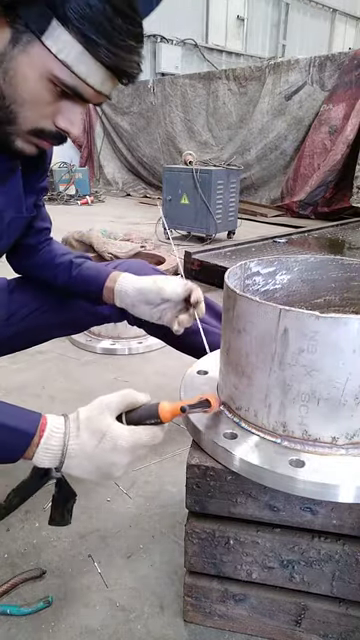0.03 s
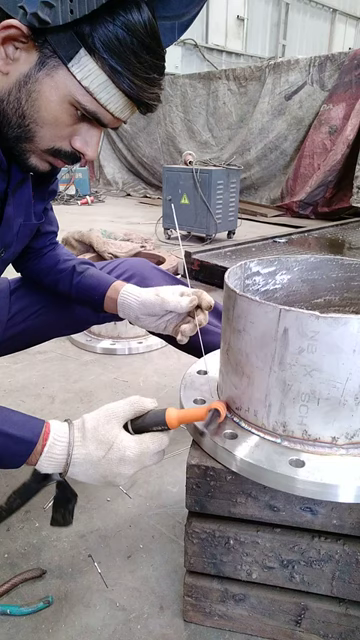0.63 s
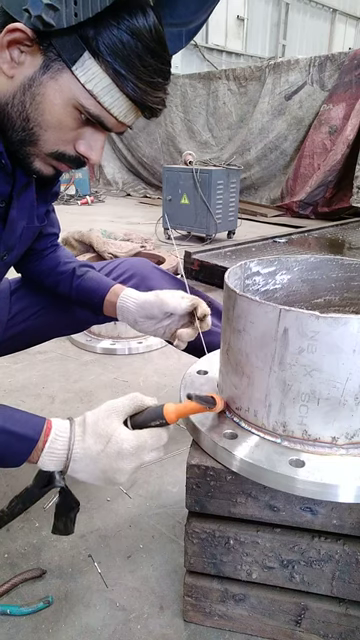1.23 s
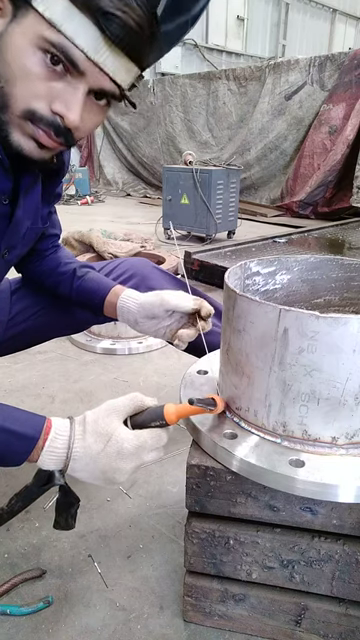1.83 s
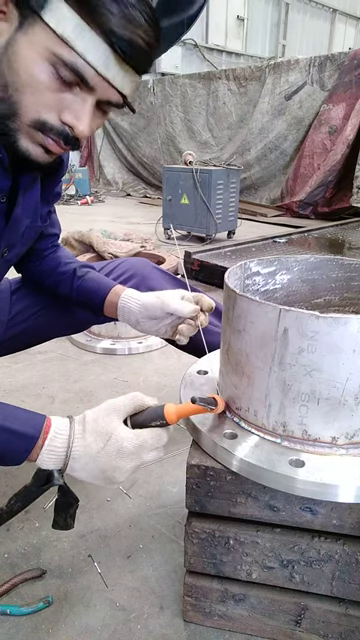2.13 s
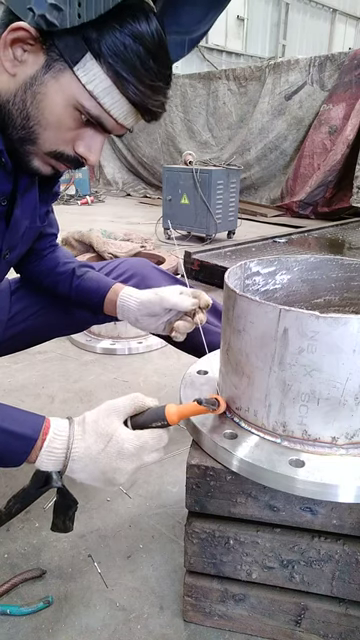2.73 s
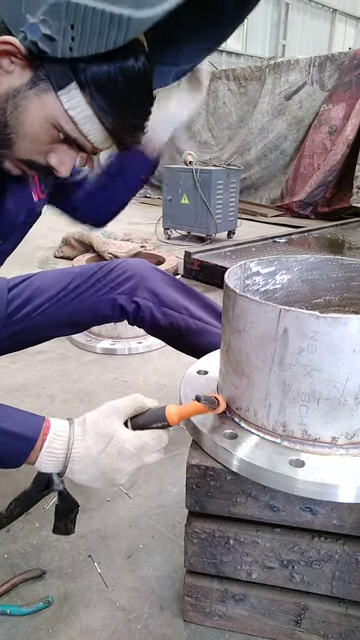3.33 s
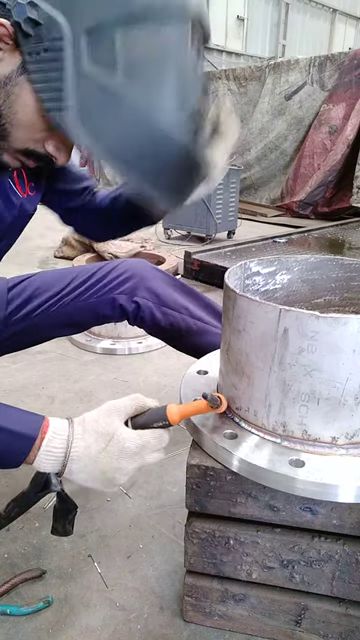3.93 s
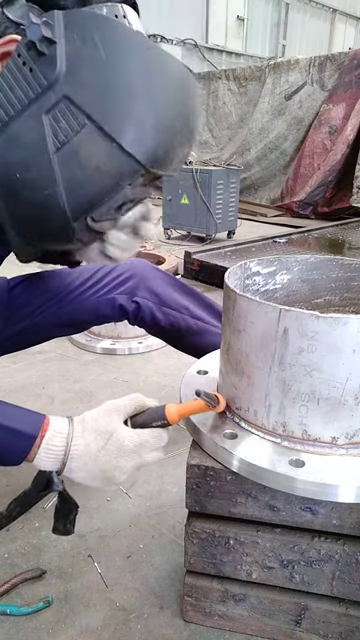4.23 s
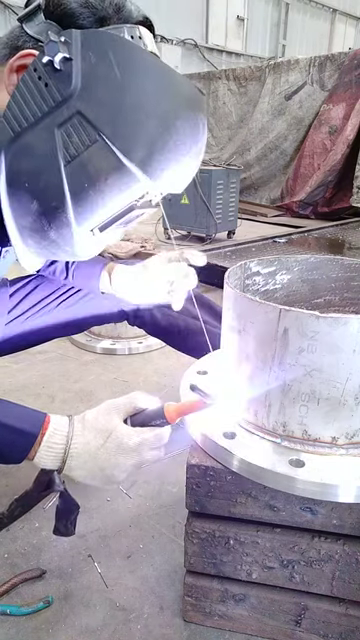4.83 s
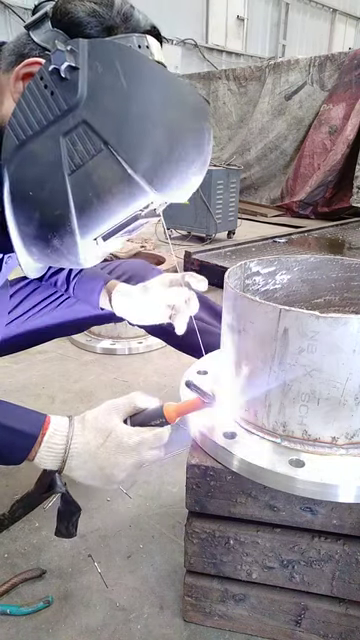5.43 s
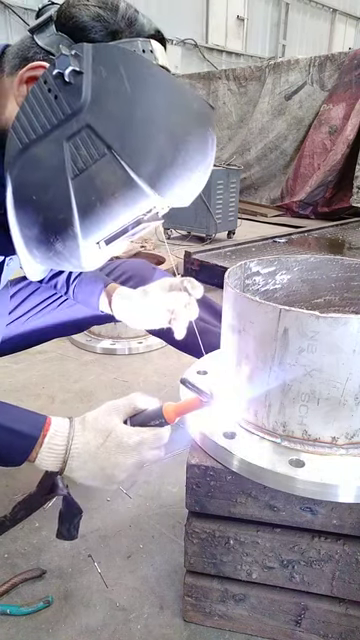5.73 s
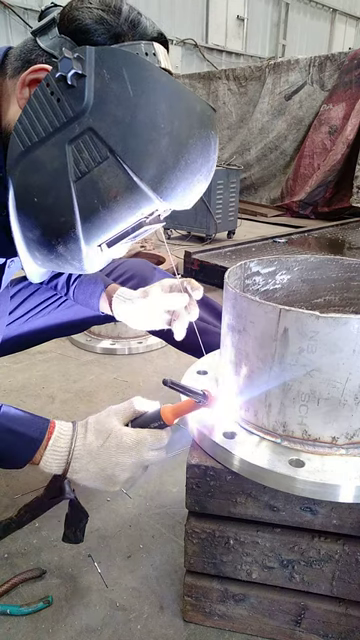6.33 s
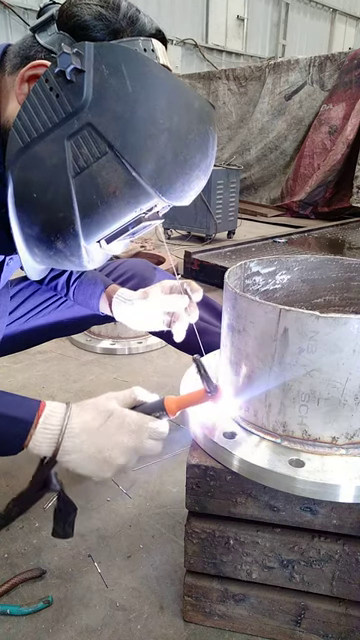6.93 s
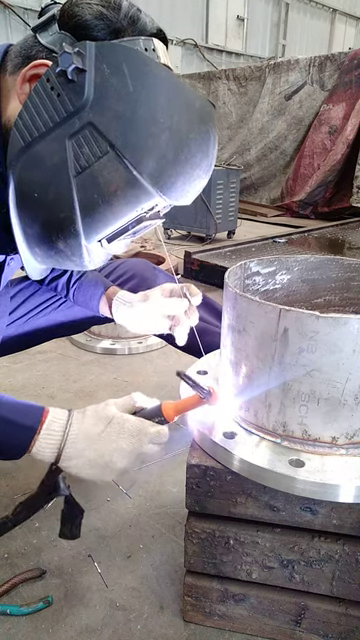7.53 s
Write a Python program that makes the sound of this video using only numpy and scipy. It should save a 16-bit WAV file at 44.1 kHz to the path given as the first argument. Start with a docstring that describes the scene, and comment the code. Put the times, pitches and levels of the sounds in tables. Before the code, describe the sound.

From the start, an angle grinder works on steel across a large workshop, giving a steady high hiss and a thin whine that flares unevenly. Beneath it run the low hum and whirring fan of a welding set. From about 2 seconds the whine rises in pitch, peaks a little after 3 seconds and falls back by 4.5. At 4 seconds a welding helmet gives one very short, high squeak. Near 4.8 seconds the starter spits faintly, and the arc strikes at once with a single sharp, close pop, the loudest sound, which echoes in the hall for about a second. The arc then burns with a soft, flickering rush with a hollow ring to it. The arc, grinder and hum continue together until the end, at about 7.7 seconds.

```python
"""TIG welding in a large workshop

An angle grinder hisses and whines across the hall, over the hum of the welding set and its fan.
A helmet squeaks down and the high-voltage starter spits. The gap to the steel flange breaks down
in one sharp pop that the hall answers; the arc then burns with a soft rush, made hollow by cavities."""
import sys
import numpy as np
from scipy import signal
from scipy.fft import rfft, irfft
from scipy.io import wavfile
from scipy.ndimage import uniform_filter1d, map_coordinates

SR = 44100
rng = np.random.default_rng(int(sys.argv[2]) if len(sys.argv) > 2 else 0)


def digitize_waveform(pressure):
    """Quantize a signal to 16-bit integers and store it at the path in sys.argv[1].

    Rows of a 2-D input are taken as channels; values are limited to [-1, 1].
    """
    field = np.atleast_2d(pressure).T
    bounded = np.clip(field, -1, 1)
    quanta = np.round(bounded * 32767).astype(np.int16)
    wavfile.write(sys.argv[1], SR, quanta)


N = 338688
TIME, HZ = np.arange(N) / SR, np.fft.rfftfreq(N, 1 / SR)
STRIKE_S, GEAR_TEETH = 4.8396, 39


def gain_of(db):
    """Amplitude ratio of a level in decibels."""
    return 10 ** (np.asarray(db) / 20)


def unit_rms(x):
    """Normalisation to an rms of 1."""
    return x / np.sqrt(np.mean(x ** 2) + 1e-20)


def spectrum(points):
    """Interpolation of (f/Hz, value) points over logarithmic frequency."""
    f, value = np.transpose(points)
    return np.interp(np.log(HZ + 1), np.log(f + 1), value)


def curve(points):
    """Linear interpolation of (t/s, value) points at every sample."""
    return np.interp(TIME, *np.transpose(points))


def swell(peak_s, length_s):
    """Raised-cosine envelope: one smooth rise to 1 and fall."""
    return np.cos(np.pi * np.clip((TIME - peak_s) / length_s, -.5, .5)) ** 2


def drift(rate_hz):
    """Random fluctuation: low-pass noise of rms 1."""
    return unit_rms(irfft(rfft(rng.standard_normal(N)) * (HZ > 0) / (1 + (HZ / rate_hz) ** 4), N))


def resonate(x, hz, width_hz):
    """Damped resonator of unit gain, whose centre frequency may glide."""
    carrier = np.exp(2j * np.pi * np.cumsum(hz * np.ones(N)) / SR)
    pole = np.exp(-np.pi * width_hz / SR)
    return 2 * (carrier * signal.lfilter([1 - pole], [1, -pole], x / carrier)).real


def narrowband(x, hz, width_hz):
    """Two resonators in cascade select one band, scaled to rms 1."""
    return unit_rms(resonate(resonate(x, hz, width_hz), hz, width_hz))


def tone(hz, db, wander_hz, waver_db):
    """Sinusoid with random frequency and amplitude modulation."""
    cycles = np.cumsum(hz + wander_hz * drift(5.83)) / SR + rng.random()
    return np.sqrt(2) * np.sin(2 * np.pi * cycles) * gain_of(db + waver_db * drift(15.4))


# Likeness of the sound at the two microphones: f/Hz, coherence (0-1)
COHERENCE = [(60, 1), (460, 0.92), (600, 0.5), (740, 0.9), (1000, 0.37), (1600, 0.4), (2400, 1), (3500, 1),
             (4200, 0.23)]
# Phase by which the left microphone leads: f/Hz, phase/rad
PHASE_LEAD = [(400, 0), (690, -.6), (950, -.2), (1200, -.8), (1900, -1.3), (2800, -2.3), (3600, -3)]
def air_noise(density_db):
    """Noise of a given spectral density, partially coherent at two points in the field."""
    left, independent = rfft(rng.standard_normal((2, N)))
    coherence = spectrum(COHERENCE)
    right = coherence * left + np.sqrt(1 - coherence ** 2) * independent
    right = right * np.exp(-1j * spectrum(PHASE_LEAD))
    return irfft(np.array([left, right]) * gain_of(density_db), N) * np.sqrt(SR / 2)


# Faint workshop tones: peak t/s, duration/s, f/Hz, peak level/dB
FAINT_TONES = [(2.4, 1.2, 1015, -56), (2.778, 0.3, 790, -48), (3.355, .6, 790, -52),
               (4.576, .45, 1416, -51)]
def faint_tones():
    """Masking: brief tones rise out of the workshop noise and sink back under it."""
    return sum(tone(hz, db, wander_hz=7, waver_db=4) * swell(s, length)
               for s, length, hz, db in FAINT_TONES)


# Tones of the welding set and other machines: f/Hz, level/dB, start t/s, end t/s, rms waver/dB
MACHINE_TONES = [(107.5, -62, 1.5, 7.68, 3), (147.6, -60, 3.5, 6.4, 1.5), (190.7, -55.5, 6, 7.68, 3),
                 (200.3, -55.5, 3.5, 4.76, 3), (212.7, -58.5, -3, 7, 3), (240, -56, 5, 7.68, 3),
                 (443.2, -46.5, 0, 7.68, 0.47), (516.5, -55.5, 5, 6.6, 2)]
def machine_hum(fade_s=0.27):
    """Machine vibration radiates low tones; those that waver more in level also stray more in pitch."""
    out = np.zeros(N)
    for hz, db, start, end, waver_db in MACHINE_TONES:
        fade = np.clip(1 + np.minimum(TIME - start, end - TIME) / fade_s, 0, 1)
        out += tone(hz, db, wander_hz=0.51 + 0.5 * waver_db, waver_db=waver_db) * fade
    return out


# Fan and workshop air: f/Hz, relative spectral level/dB
FAN_AIR = [(25, -99), (48, -95), (70, -84), (105, -72.5), (210, -71.5), (400, -73), (620, -73.5),
           (780, -70), (1250, -71.5), (1450, -71), (1800, -71), (2200, -77), (3600, -77.5), (9000, -105)]
# Resonances of the fan casing: f/Hz, bandwidth/Hz, level/dB
CASING_MODES = [(774.6, 18, -55), (1408, 41, -49.5), (2510, 20, -52.5)]
# Motor whine and sidebands: offset in multiples of the shaft frequency, relative level/dB
MOTOR_LINES = [(-2, -11), (-1, -9), (0, 1.5), (1, -6.5)]
def welder_fan(shaft_hz=24.6, whine_hz=1790, whine_db=-52):
    """Turbulence excites the casing's modes; modulation once a turn gives the motor whine sidebands."""
    flow = air_noise(spectrum(FAN_AIR))
    casing = sum(gain_of(db) * unit_rms(resonate(air_noise(spectrum(FAN_AIR)), hz, width))
                 for hz, width, db in CASING_MODES)
    motor = [sum(tone(whine_hz + order * shaft_hz, whine_db + db, wander_hz=1.17, waver_db=4)
                 for order, db in MOTOR_LINES) for _ in range(2)]
    return (flow + casing) * gain_of(-0.78 + 1.25 * drift(14)) + np.array(motor)


def disc_grit(turn_s, likeness):
    """Comb filtering: the same grit comes round on each turn, adding delayed copies of its noise."""
    def turns_ago(x, turns):
        return map_coordinates(x, [np.arange(N) - turns * turn_s * SR], order=3, mode="wrap")
    noise = rng.standard_normal((2, N))
    return noise + sum(likeness ** k * np.array([turns_ago(x, k) for x in noise]) for k in (1, 2, 3))


# Hiss of the disc on steel: f/Hz, relative spectral level/dB
DISC_HISS = [(40, -55), (700, -16), (2200, -7), (3200, -6.5), (3700, -4), (4100, 2), (5200, 2.5),
             (6000, 1.2), (7300, 1.2), (7900, -4), (8200, -14), (8700, -14), (9400, -20), (10400, -27.5),
             (12500, -30), (15500, -45)]
# Reflections off the pipe and flange: left delay/s, right delay/s, relative level/dB
REFLECTIONS = [(.00145, 0.0013, -52), (.0024, 0.0017, -23)]
def disc_hiss(grit, effort_db, fizz_hz=8300, brightening=0.13):
    """Friction noise interferes with its reflections; the top fizz grows fastest with effort."""
    paths = 1 + sum(gain_of(db) * np.exp(-2j * np.pi * HZ * np.array([[left], [right]]))
                    for left, right, db in REFLECTIONS)
    hiss = unit_rms(irfft(rfft(grit) * paths * gain_of(spectrum(DISC_HISS)), N))
    fizz = irfft(rfft(hiss) * (HZ > fizz_hz), N)
    hiss += fizz * (gain_of(brightening * (effort_db - effort_db.mean())) - 1)
    flutter_db = 0.84 * drift(17) + 0.66 * drift(210)
    return hiss * gain_of(effort_db + 2.5 + flutter_db)


# Flares of the gear whine: peak t/s, duration/s, level change/dB
WHINE_FLARES = [(0.174, 0.11, 11.5), (.245, .07, 9), (.345, .06, 5), (.405, .07, 9), (0.513, .12, 8),
                (.587, .08, 11.5), (.66, .05, 0), (0.757, 0.11, 4), (.85, 0.073, 2), (.955, .11, 7.5),
                (1.1, .06, 0), (1.21, 0.066, 6), (1.306, 0.13, 9), (1.39, .07, 5), (1.553, .1, 5),
                (1.7, 0.1, 6.5), (2.87, .08, 6), (3.345, 0.12, 10), (3.47, .1, 4.5), (3.668, .14, 8.5),
                (3.76, .07, 5.5), (3.86, .1, 8), (4.094, 0.15, 9), (4.22, 0.19, 9.5), (4.37, .08, 5),
                (4.47, .16, 7.5), (4.58, .06, 5), (4.802, .07, 3), (4.91, .07, 9), (4.966, 0.062, -5),
                (5.135, .06, 5), (5.265, .09, 7.5), (5.33, .06, 2), (5.497, 0.099, 10.5), (5.67, .07, 11),
                (5.718, 0.088, 10), (5.846, .09, 7), (5.96, .09, 14), (6.04, .07, 5), (6.11, 0.1, 7.5),
                (6.213, 0.087, 7), (6.3, 0.19, 10.5), (6.42, 0.067, 5), (6.582, 0.11, 11.5),
                (6.737, .09, 6), (6.92, .06, 7), (7, 0.098, 8.5), (7.1, 0.054, 5), (7.263, .08, 1),
                (7.348, 0.12, 6.5), (7.514, .14, 9), (7.632, 0.064, 13)]
# Gear mesh, sidebands and a high overtone: multiple of the disc frequency, relative level/dB
GEAR_ORDERS = [(36, -15), (38, -26), (39, -3), (40, -14.5), (45, -16), (65, -21)]
def gear_whine(grit, mesh_hz, steadiness, effort_db, breath_db=-8.7, lines_db=-3.2):
    """Periodic tooth contact gives a breathy band and, at steady speed, thin spectral lines."""
    level_db = effort_db - 5.5 + sum(db * swell(s, length) for s, length, db in WHINE_FLARES)
    surge_db = 0.16 * (level_db - level_db.mean())  # surges favour the lines over the band
    breath = narrowband(grit, mesh_hz, width_hz=380) * gain_of(breath_db - surge_db)
    turns = np.cumsum(mesh_hz + 2.37 * drift(40)) / SR / GEAR_TEETH
    mesh = sum(gain_of(db) * np.exp(2j * np.pi * (order * turns + rng.random()))
               for order, db in GEAR_ORDERS)
    mesh *= gain_of(-15 * np.log2(mesh_hz / mesh_hz.mean()))  # louder as load drags the speed down
    # shifting paths vary the phase and level at each microphone
    lines = np.array([(mesh * np.exp(0.7j * drift(3.6))).real * gain_of(0.9 * drift(39))
                      for _ in range(2)])
    lines *= np.sqrt(2) * steadiness * gain_of(lines_db + surge_db / 2)
    return gain_of(level_db) * (breath + lines)


# The grinder's speed, heard as its gear-mesh frequency: t/s, f/Hz
MESH_PITCH = [(0, 4530), (.25, 4540), (.5, 4585), (1.4, 4595), (1.75, 4620), (1.92, 4685), (2.18, 4725),
              (2.4, 4885), (2.8, 5100), (3.1, 5210), (3.4, 5212), (3.7, 5175), (4.2, 4690), (4.38, 4550),
              (4.58, 4550), (4.72, 4462), (5.6, 4458), (6, 4415), (6.5, 4398), (7.1, 4418), (7.4, 4420),
              (7.68, 4450)]
# Grinding effort, heard as loudness: t/s, relative level/dB
GRINDING_EFFORT = [(0, -34.5), (.13, -36), (.2, -34.5), (1.4, -35.3), (2, -34), (2.3, -34), (2.55, -33.5),
                   (2.78, -32.5), (3.05, -33.5), (3.45, -32), (4, -31), (4.5, -34.5), (4.95, -33.5),
                   (5.42, -35), (5.65, -33.5), (7.68, -33.5)]
# Cooling air at top speed: f/Hz, spectral level/dB
COOLING_AIR = [(40, -105), (90, -84), (170, -94), (400, -78.5), (750, -78.5), (1300, -71.5), (2000, -82),
               (4000, -100), (9000, -130)]
def grinder(smear_hz_per_s=1500, cooling_db_per_octave=60):
    """Friction, gear and flow noise; the cooling air's rush swells steeply as the grinder speeds up."""
    mesh_hz, effort_db = curve(MESH_PITCH), curve(GRINDING_EFFORT)
    glide = uniform_filter1d(np.gradient(mesh_hz) * SR, size=8000)
    steadiness = 1 / (1 + (glide / smear_hz_per_s) ** 2)  # the hall smears gliding lines
    grit = disc_grit(turn_s=GEAR_TEETH / mesh_hz, likeness=0.42 * steadiness)
    hiss = disc_hiss(grit, effort_db)
    speed_octaves = np.log2(mesh_hz / mesh_hz.max())
    cooling = air_noise(spectrum(COOLING_AIR)) * gain_of(cooling_db_per_octave * speed_octaves)
    return hiss + cooling + gear_whine(grit, mesh_hz, steadiness, effort_db)


def helmet_squeak():
    """Friction at the pivot gives one narrow-band scrape as the helmet swings down."""
    scrape = narrowband(rng.standard_normal((2, N)), hz=6400, width_hz=170)
    return gain_of(-29.5) * scrape * swell(peak_s=3.996, length_s=0.034)


# Whiskers of discharge from the starter: start t/s, duration/s, f/Hz, bandwidth/Hz, level/dB
STARTER_SPITS = [(4.779, 0.017, 12600, 1800, -45), (4.828, 0.017, 7550, 2500, -35),
                 (4.829, .01, 12500, 1500, -48), (4.836, .012, 15000, 2500, -48)]
def starter():
    """Partial discharges fizz briefly as the high voltage reaches for the steel."""
    out = np.zeros((2, N))
    for s, length, hz, width, db in STARTER_SPITS:
        fizz = narrowband(rng.standard_normal((2, N)), hz, width)
        out += gain_of(db) * fizz * np.sin(np.pi * np.clip((TIME - s) / length, 0, 1))
    return out


def hall_reverberation(build_s=0.098, t60_s=1.0):
    """The far walls return the pop as a diffuse wash that builds, then decays exponentially."""
    colour_db = spectrum([(40, -44), (200, -27), (550, 3), (1000, 2), (1600, 6), (2400, 3),
                          (3300, -1), (5000, 4), (8000, -11), (11000, -38), (15000, -30)])
    age = np.maximum(TIME - STRIKE_S, 0)
    return air_noise(colour_db - 60) * (1 - np.exp(-age / build_s)) * gain_of(-60 * age / t60_s)


# Modes of the steel: f/Hz, relative level/dB, T60/s
STEEL_MODES = [(520, -27, .01), (1570, -19, 0.0079), (4700, -2, .003), (5500, 1, 0.004), (6360, 1, 0.0063)]
def spark(t, pulse_db, pulse_s=0.00014, ring_lead_s=0.00012, ring_rise_s=0.00025, ring_left_db=-17):
    """Impulse excitation: one pressure pulse at t = 0 and a brief, damped ring of steel."""
    u = t / pulse_s
    pulse = gain_of(pulse_db) * (u ** 2 - 1) * np.exp(-u ** 2 / 2)
    age = np.maximum(t + ring_lead_s, 0)
    ring = -sum((-1) ** k * gain_of(db - 60 * age / t60) * np.sin(2 * np.pi * hz * age)
                for k, (hz, db, t60) in enumerate(STEEL_MODES))
    onset = 1 - np.exp(-(age / ring_rise_s) ** 2)
    return pulse + ring * onset * gain_of([[ring_left_db], [0]])


# The pop scattered by pipe, flange and helmet: f/Hz, relative spectral level/dB
POP_SCATTER = [(200, -26.5), (500, 6), (900, 1), (2500, 4.5), (5000, -4), (7500, -6), (10000, -28)]
def strike(right_lead_s=0.0001, echo_s=0.0065, scatter_t60_s=0.068):
    """Dielectric breakdown of the gap: the pop arrives directly, off the floor and by scattering."""
    t = TIME - STRIKE_S + np.array([[0], [right_lead_s]])
    floor_echo = gain_of(-12) * spark(t - echo_s, pulse_db=-9)
    decay = (t > 0) * gain_of(-60 * np.maximum(t, 0) / scatter_t60_s)
    scatter = air_noise(spectrum(POP_SCATTER) - 58.5) * decay
    return spark(t, pulse_db=-1) + floor_echo + scatter


# Strength of the burning arc: t/s, relative level/dB
ARC_STRENGTH = [(5.1, 0), (5.27, 2), (5.42, -7), (5.5, -1), (5.68, 1.5), (6.3, 0), (6.85, -2), (7.68, -2.5)]
# The arc's broad rush: f/Hz, relative spectral level/dB
ARC_RUSH = [(30, -110), (100, -91), (500, -75.5), (900, -77.5), (1500, -73), (2300, -84), (4000, -69.5),
            (6000, -108), (11000, -109.5), (15500, -108)]
# Cavity modes of pipe and helmet: f/Hz, bandwidth/Hz, level/dB, peak t/s, time to fall 9 dB/s
CAVITY_MODES = [(785, 36, -50.5, 5.84, 0.59), (1403, 25, -42.5, 5.52, 0.19), (1370, 7.1, -45, 8.1, 1.94),
                (1474, 11, -50, 6.6, 1.5), (2230, 38, -48.5, 6, 1.4), (2614, 8, -48.5, 7, 2.5),
                (2970, 39, -47.5, 6, 2.5)]
def arc(rise_s=0.097, flicker_db=1.5):
    """Cavity resonance: the arc's flickering rush drives hollow modes, each loudest at its own time."""
    rush = air_noise(spectrum(ARC_RUSH))
    hollow = np.zeros((2, N))
    for hz, width, db, peak_s, fall_s in CAVITY_MODES:
        level_db = db - 9 * ((TIME - peak_s) / fall_s) ** 2
        hollow += gain_of(level_db) * unit_rms(resonate(rush, hz, width))
    lit = np.clip((TIME - STRIKE_S) / rise_s, 0, 1)
    return (rush + hollow) * lit * gain_of(curve(ARC_STRENGTH) + flicker_db * drift(26))


def scene():
    """Superposition: the machines run throughout; the helmet drops, the arc strikes and burns on."""
    workshop = grinder() + welder_fan() + machine_hum() + faint_tones()
    return workshop + starter() + strike() + hall_reverberation() + arc() + helmet_squeak()


# Balance of the microphone pair: f/Hz, left minus right level/dB
BALANCE = [(100, 1), (420, 1.5), (530, 6), (700, 1), (1020, 5), (1300, 2), (1650, 4.5), (2800, 0),
           (3700, 0.5), (4200, 2), (4700, 7.5), (5500, 0.5), (7300, 2), (9000, 5), (14000, 2)]
# Narrow notch in the signal both microphones share: f/Hz, gain/dB
MID_NOTCH = [(2700, 0), (3170, -1), (3380, -16), (3540, -86), (3660, -51), (3760, -17.5), (3950, -3),
             (4150, 0)]
def record(dry, threshold_db=-17, recovery_db_per_s=260, squeeze=0.3, cutoff_hz=15720):
    """Microphone colour, dynamic compression that ducks after the pop, and a low-pass band limit."""
    left, right = rfft(dry) * gain_of(np.array([[.5], [-.5]]) * spectrum(BALANCE))
    mid = (left + right) / 2 * gain_of(spectrum(MID_NOTCH))
    side = (left - right) / 2
    x = irfft(np.array([mid + side, mid - side]), N)
    power_db = 10 * np.log10(abs(uniform_filter1d((x ** 2).mean(0), size=40)) + 1e-12)
    release_db = TIME * recovery_db_per_s
    held_db = np.maximum.accumulate(power_db + release_db) - release_db  # peak hold, falling steadily
    excess_db = np.maximum(held_db - threshold_db, 0)
    x = x / gain_of(squeeze * uniform_filter1d(excess_db, size=40))
    lowpass = signal.firwin(511, cutoff_hz, window=("kaiser", 9), fs=SR)
    return signal.oaconvolve(x, lowpass[None], "same")


dry = scene()
out = record(dry)
digitize_waveform(out)
```